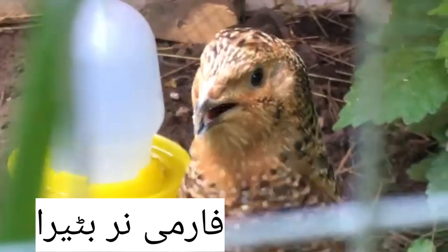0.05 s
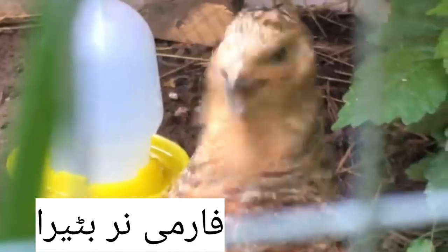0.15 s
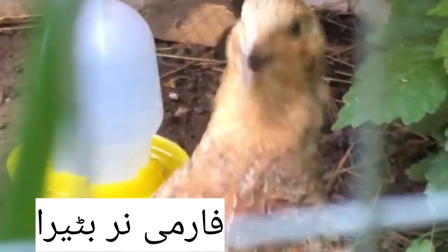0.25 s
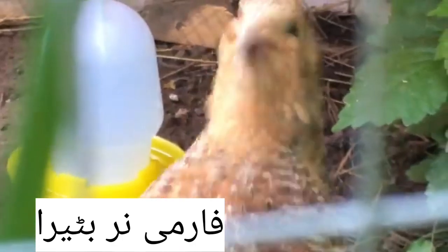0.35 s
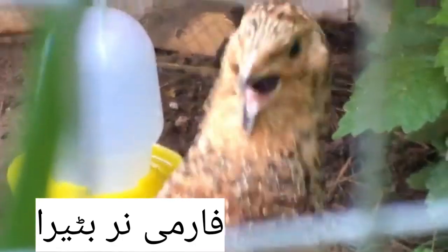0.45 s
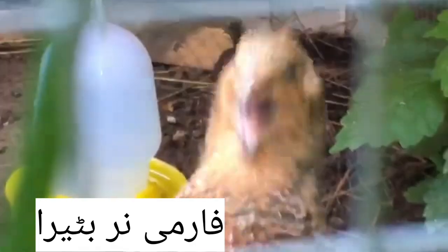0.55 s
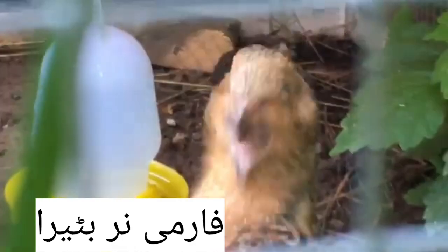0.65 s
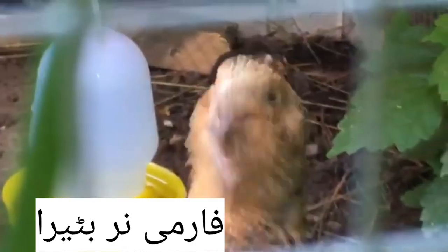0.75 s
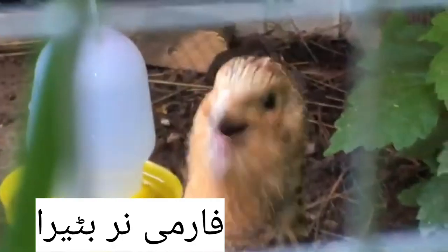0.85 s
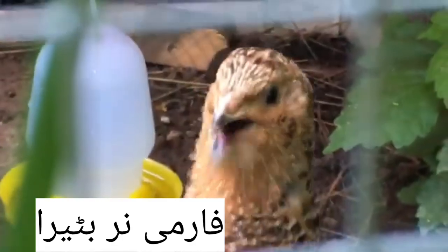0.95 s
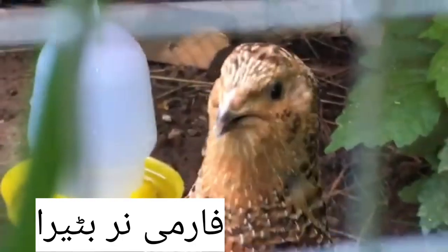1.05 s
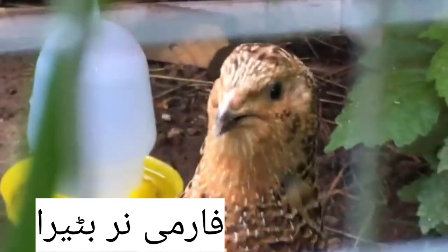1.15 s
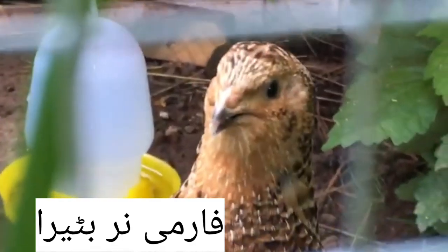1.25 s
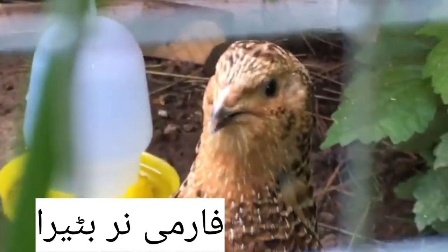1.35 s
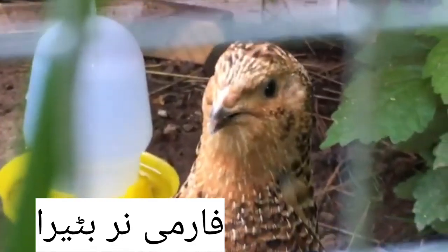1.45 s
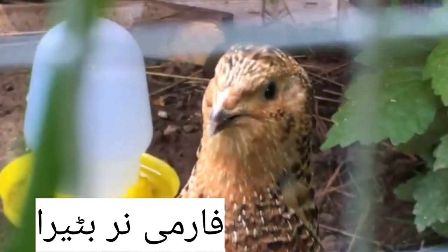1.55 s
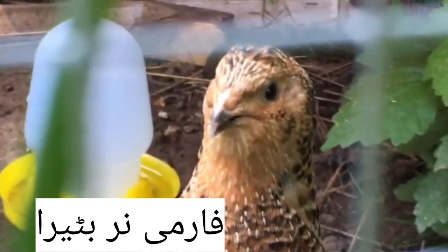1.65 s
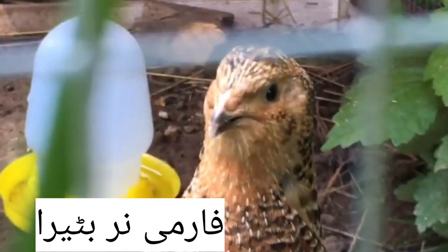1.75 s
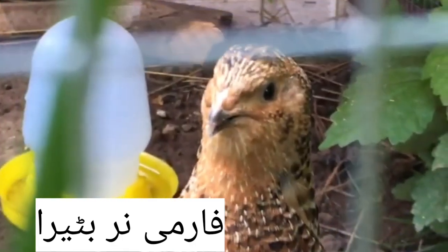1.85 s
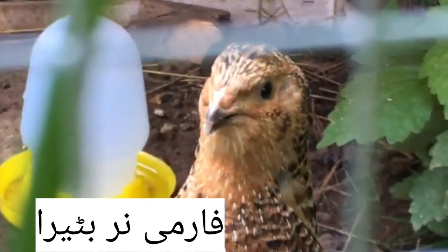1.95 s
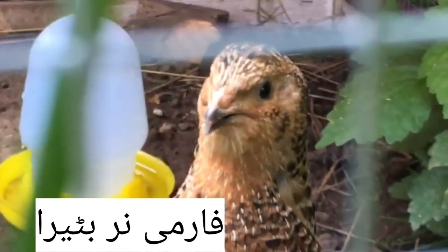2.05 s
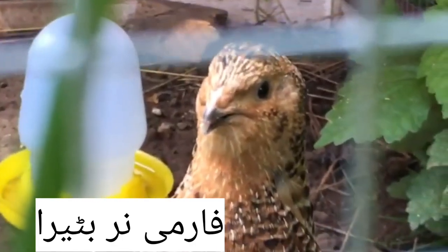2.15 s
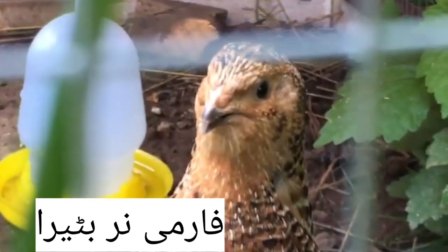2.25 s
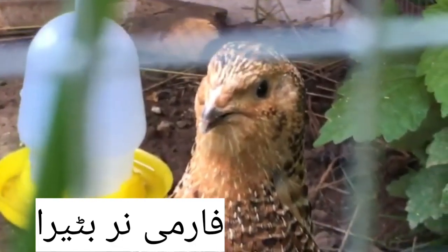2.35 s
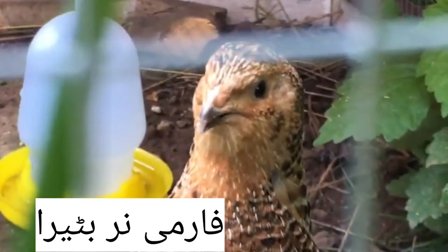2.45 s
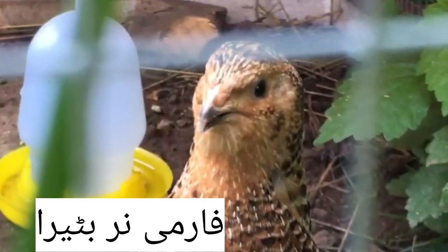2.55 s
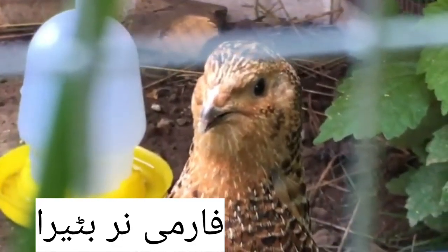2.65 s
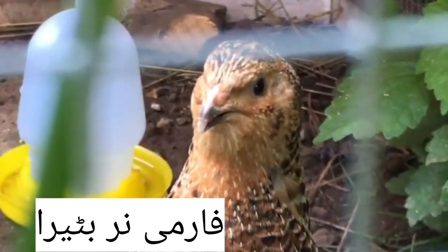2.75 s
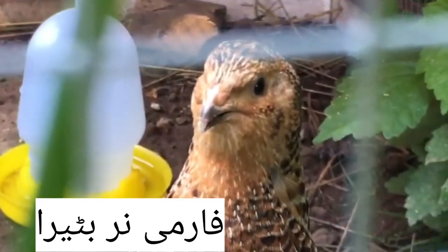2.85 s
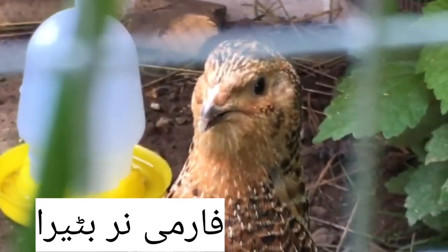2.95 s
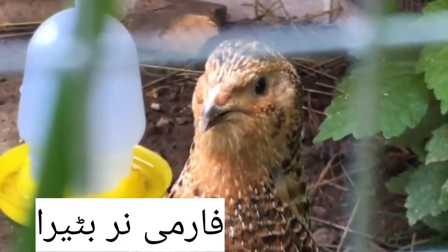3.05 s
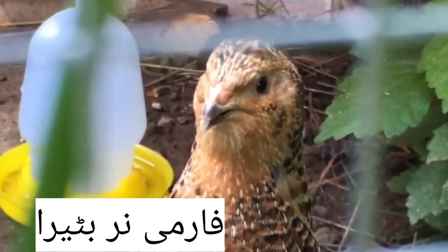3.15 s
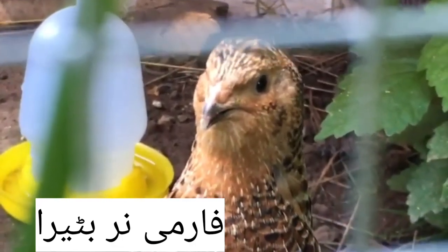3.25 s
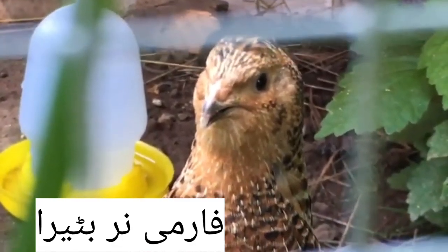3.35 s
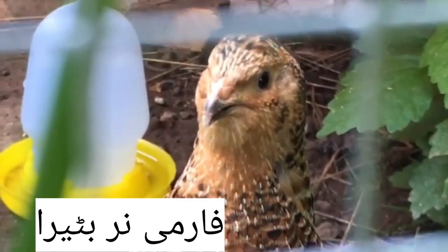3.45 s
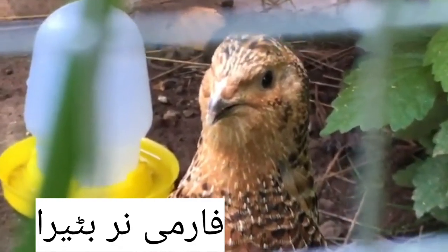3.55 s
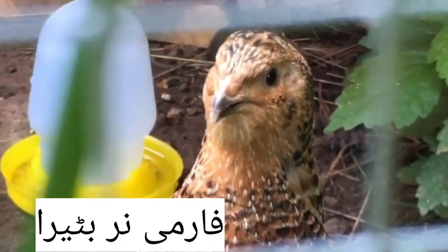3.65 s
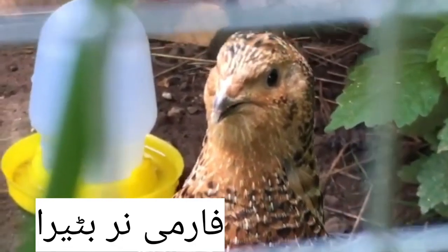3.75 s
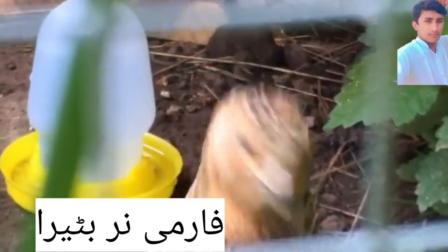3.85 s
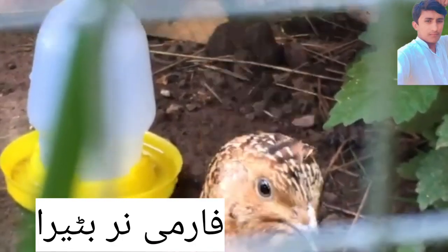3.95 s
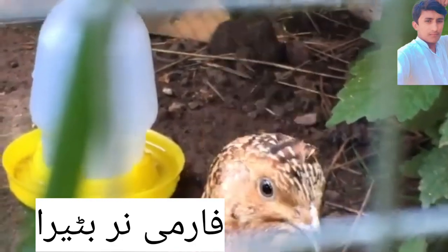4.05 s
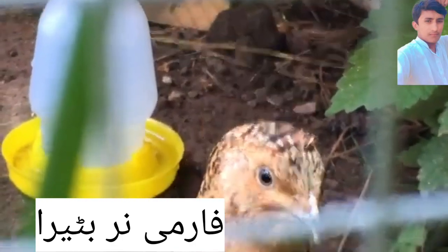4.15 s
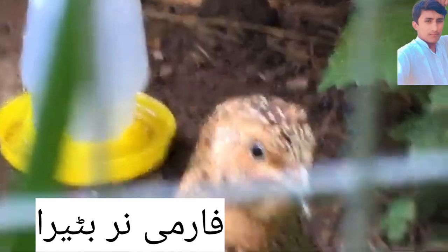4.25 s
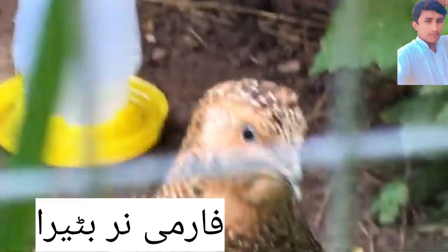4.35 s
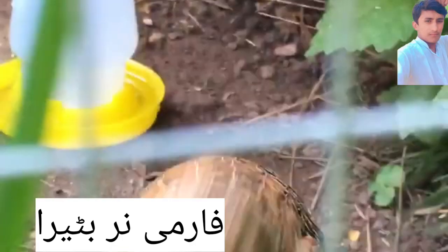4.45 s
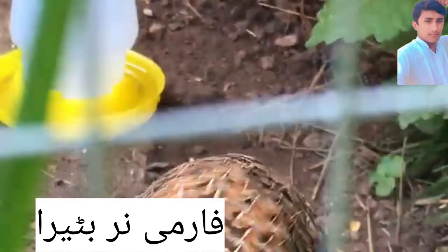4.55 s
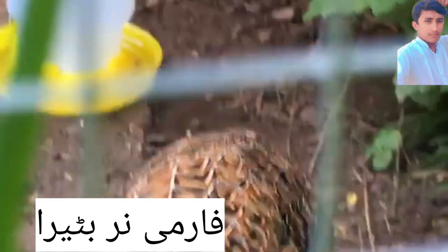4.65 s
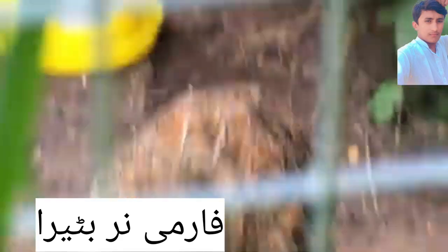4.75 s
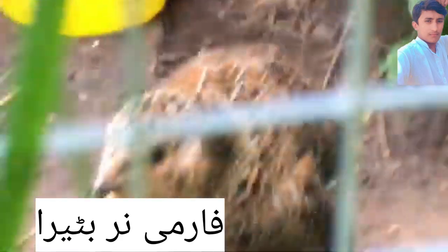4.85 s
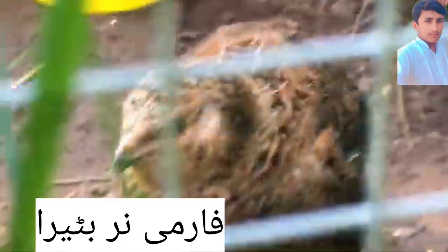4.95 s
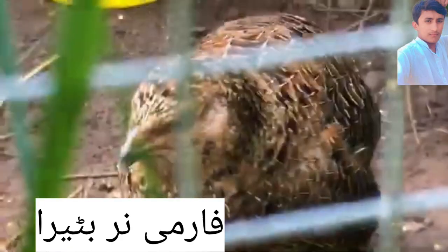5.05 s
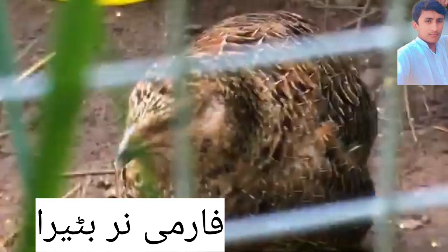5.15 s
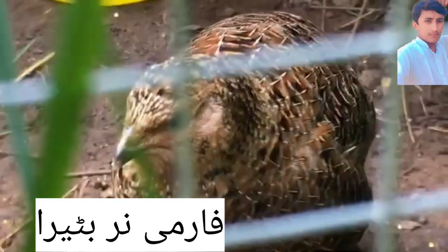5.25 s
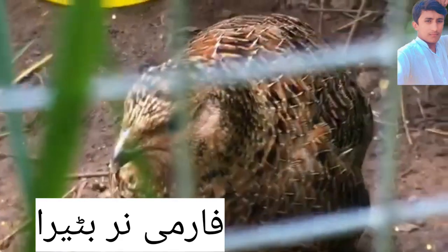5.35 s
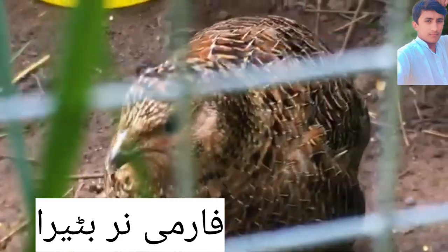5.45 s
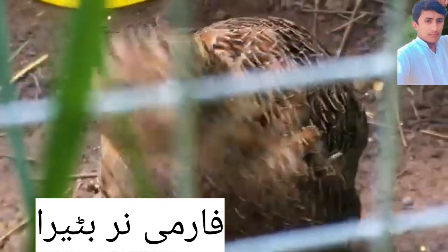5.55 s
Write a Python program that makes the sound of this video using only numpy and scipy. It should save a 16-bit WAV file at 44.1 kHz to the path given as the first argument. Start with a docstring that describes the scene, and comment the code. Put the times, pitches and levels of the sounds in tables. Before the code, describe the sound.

Outdoor yard, close microphone beside a wire cage. One shrill quail crow opens: a quick chirped note, a second short sweep, then a rough trill of rapid up-and-down whistles breaking into rasp and ending hoarse. Afterwards there is near quiet: soft low rumble, faint airy rush and hiss, a few distant falling chirps, the clearest just after three seconds, and small dry rustles.

```python
"""Outdoors in a yard, close to a wire cage: a male quail crows once, two short notes, then a harsh trill.
Its voice is a swept whistle that breaks into noisy rasp at the top of every sweep, shaped by throat and beak.
Ground and cage walls answer with delayed copies, ringing and a short tail; the recorder's gain ducks.
Behind it, filtered noise makes a low rumble, a distant rush, a thin high hiss and light rustles of straw.
Far chirps are short falling tones; a faint far tone and a soft drone come and go."""
import sys
import numpy as np
from scipy import signal
from scipy.fft import rfft, irfft, next_fast_len
from scipy.io import wavfile
from scipy.ndimage import uniform_filter1d, minimum_filter1d, map_coordinates

SR = 44100
rng = np.random.default_rng(int(sys.argv[2]) if len(sys.argv) > 2 else 0)


def wav_out(sig):
    """Save sig, one row per channel (or a flat mono array), as 16-bit PCM at SR to the path in sys.argv[1]."""
    wavfile.write(sys.argv[1], SR, np.round(np.clip(np.atleast_2d(sig).T, -1, 1) * 32767).astype(np.int16))


N = 246519
TOP_HZ = 15830  # upper limit of the recorder and of the whistle's overtones


def amp(db):
    """Decibels to gain."""
    return 10 ** (np.asarray(db) / 20)


def unit(x):
    """Scale to rms 1."""
    return x / np.sqrt(np.mean(x ** 2) + 1e-20)


def along(points, hz):
    """Read (Hz, value) points on a log frequency axis."""
    f, v = np.transpose(points)
    return np.interp(np.log(hz + 1), np.log(f + 1), v)


def clock():
    """The time of every sample, in seconds."""
    return np.arange(N) / SR


def curves(rows):
    """One value per sample for each column after the time."""
    s, *columns = np.transpose(rows)
    return [np.interp(clock(), s, column) for column in columns]


def wobble(rate):
    """A smooth random curve with rate knots a second."""
    knots = rng.standard_normal(int(N * rate / SR) + 4)
    return map_coordinates(knots, [np.arange(N) * rate / SR])


def filtered(x, response):
    """Multiply the spectrum of x by a complex response of frequency."""
    m = next_fast_len(N + SR // 2)
    return irfft(rfft(x, m) * response(np.fft.rfftfreq(m, 1 / SR)), m)[..., :N]


def resonate(x, modes):
    """Pass x through parallel (Hz, width Hz, dB) resonances."""
    def response(f):
        return sum(amp(db) * 1j * f * width / (center ** 2 - f * f + 1j * f * width)
                   for center, width, db in modes)
    return filtered(x, response)


def noise(spectrum):
    """Coloured noise of rms 1."""
    return unit(filtered(rng.standard_normal(N), lambda hz: amp(along(spectrum, hz))))


def turns(hz):
    """The running phase of a moving pitch, in radians."""
    return 2 * np.pi * np.cumsum(hz) / SR


def tone(hz):
    """A sine of rms 1 that follows a moving pitch."""
    return np.sqrt(2) * np.sin(turns(hz))


def swell(start, length):
    """A smooth rise and fall."""
    return np.sin(np.pi * np.clip((clock() - start) / length, 0, 1))


# spectrum of the ground rumble: [f/Hz, relative level/dB per Hz]
RUMBLE_SPECTRUM = [(15, -40.5), (23, -14.5), (31, -17.5), (42, -6), (55, 2.5), (80, -0.5), (110, -0.5),
                   (145, -8), (200, -10), (280, -24), (450, -30), (600, -54.5)]


def low_rumble(start_db=-40.5, rise_db_per_s=0.4151, sway_db=.6):
    """Low noise that slowly grows and sways a little."""
    level_db = start_db + rise_db_per_s * clock() + sway_db * wobble(11)
    return amp(level_db) * noise(RUMBLE_SPECTRUM)


# spectrum of the distant rush: [f/Hz, relative level/dB per Hz]
RUSH_SPECTRUM = [(150, -25), (300, 0.5), (420, -4.5), (600, -5), (900, -7), (1500, -11.5), (2300, -17),
                 (4500, -23), (6000, -43)]


def distant_rush(level_db):
    """Broad low noise at a slowly moving level, with slight unsteadiness."""
    return amp(level_db + 0.55 * wobble(8.3)) * noise(RUSH_SPECTRUM)


# the faint far tone: [start t/s, length/s, peak level/dB]
FAR_TONE = [(3.298, 1.47, -64.5), (5.05, 0.66, -65)]


def far_tone(hz=775):
    """A faint, slightly unsteady sine that comes and goes."""
    level = sum(amp(db) * swell(s, length) for s, length, db in FAR_TONE)
    return level * tone(hz * (1 + .004 * wobble(21)))


def soft_drone(peak_db=-63):
    """A narrow low band of noise that swells once and fades."""
    band = noise([(200, -60), (310, -10), (400, 3), (480, -27), (800, -80)])
    return amp(peak_db) * swell(1.603, 1.5) * band


# spectrum of the thin hiss before its pitch drifts: [f/Hz, relative level/dB]
HISS_SPECTRUM = [(2240, -42), (3800, -15.5), (4210, -18.5), (4570, -10.5), (4880, -12), (6010, -4),
                 (6540, 0), (7280, -7), (8400, -8), (10300, -19), (11800, -20), (15200, -20),
                 (15800, -19.5)]
# drift of the hiss's peak; only the ratio to the highest value counts: [t/s, f/Hz]
HISS_DRIFT = [(0, 6450), (2.3, 6477), (3.9, 6346), (4.8, 5945), (5.6, 6078)]


def thin_hiss():
    """High noise read at a varying speed, which moves its spectral peak."""
    hz, = curves(HISS_DRIFT)
    place = np.cumsum(hz / hz.max())
    return unit(map_coordinates(noise(HISS_SPECTRUM), [place], order=5, mode="wrap"))


# open-air levels: [t/s, distant rush level/dB, thin hiss level/dB]
AIR_LEVELS = [(0, -55, -58), (2.3, -59, -58), (3.2, -58.5, -58.5), (3.7, -56.5, -59.5), (4.3, -57, -60),
              (4.8, -58.5, -62.5), (5.4, -57, -63)]


def outdoors():
    """The steady bed of the place: rumble, rush, far tone, drone and hiss summed."""
    rush_db, hiss_db = curves(AIR_LEVELS)
    low = low_rumble() + distant_rush(rush_db)
    return low + far_tone() + soft_drone() + amp(hiss_db) * thin_hiss()


# decay of the yard: [f/Hz, time to fall 60 dB/s]
YARD_DECAY = [(400, .1), (1800, 0.19), (4000, 0.067), (12000, 0.075)]


def yard(x):
    """A short diffuse tail of decaying noise; each frequency dies at its own speed."""
    hz, t, z = signal.stft(rng.standard_normal(SR // 2), SR, nperseg=256)
    decay = amp(-60 * t / along(YARD_DECAY, hz)[:, None])
    tail = signal.istft(z * decay, SR, nperseg=256)[1]
    return signal.fftconvolve(x, tail / np.linalg.norm(tail))[:N]


# far birds: [start t/s, length/s, start f/Hz, end f/Hz, relative peak level/dB]
FAR_CHIRPS = [(2.16, 0.057, 5200, 5000, -69), (2.41, .1, 3900, 3420, -68), (3.268, 0.019, 3200, 3065, -59),
              (3.279, 0.026, 4120, 3660, -50.5), (3.297, 0.036, 3230, 3094, -54.5),
              (4.011, 0.0532, 4100, 3700, -68), (4.06, .07, 3900, 3500, -68)]


def far_birds(waver=0.082, direct=0.51, wet=0.99):
    """Small falling, wavering tones, blurred by distance through the yard's tail."""
    song = np.zeros(N)
    for s, length, start_hz, end_hz, db in FAR_CHIRPS:
        hz = np.interp(clock(), [s, s + length], [start_hz, end_hz])
        song += amp(db) * swell(s, length) * tone(hz * (1 + waver * wobble(1100)))
    return direct * song + wet * yard(song)


# straw underfoot: [start t/s, length/s, peak level/dB]
STRAW_STROKES = [(1.996, 0.033, -63), (2.867, .15, -62), (3.555, .15, -64), (3.737, 0.15, -70),
                 (4.878, 0.011, -57.5), (5.116, .14, -59)]
# spectrum of the straw: [f/Hz, relative level/dB per Hz]
STRAW_SPECTRUM = [(5000, -12), (9000, -4), (12500, -2.5), (15800, -1)]


def straw(grain_db=3):
    """Brief rustles of bright noise, made grainy by a fast random level."""
    strokes = sum(amp(db) * swell(s, length) for s, length, db in STRAW_STROKES)
    grains = noise(STRAW_SPECTRUM) * amp(grain_db * wobble(250))
    return strokes * unit(grains)


def opening_note(pitch_curve=.85, gain_curve=1.2, fizz_curve=2, fizz_db=3.0):
    """Pitch, gain, roughness and fizz of one push of effort, which lifts pitch and loudness together."""
    start_s, rise_s, fall_s = .1565, .0205, .041
    low_hz, peak_hz, peak_db, roughness = 1170.6, 1989, 2.5, 0.11
    peak_s = start_s + rise_s
    effort = np.interp(clock(), [start_s, peak_s, peak_s + fall_s], [0, 1, 0])
    hz = low_hz + (peak_hz - low_hz) * effort ** pitch_curve
    gain = amp(peak_db) * effort ** gain_curve
    fizz = amp(fizz_db) * effort ** fizz_curve
    return np.array([hz, gain, np.full(N, roughness), fizz]) * (effort > 0)


# one sweep from flick to flick: [share of the cycle, height 0-1 from dip to crest,
# relative level/dB, roughness 0-1, relative fizz level/dB]
SWEEP_SHAPE = [(0, .54, 0, 0.24, -2), (.06, .97, -2.5, .5, -4.5), (.21, 1, -10.5, .72, -8.5),
               (.44, .5, -1.5, .52, 5), (.6, 0, -3.5, 0.2, -4.5), (.8, .05, -4.5, .15, 0.5),
               (.93, .17, 0.5, .05, -1)]


def sweeps(phrase, flick_s, sweep_s=.0459, crest_hz=4570, fizz_growth=1.7):
    """Pitch, gain, roughness and fizz of steady sweeps: a clean dip, a flick to a rough crest, a fall."""
    attack_s, release_s = .007, .028
    dip_hz, db, hoarse = curves(phrase)
    share, *shape = np.transpose(SWEEP_SHAPE)
    t = clock()
    # wait in the dip until the first flick is due
    dip_share = share[np.argmin(shape[0])]
    cycle = np.maximum((t - flick_s) / sweep_s, dip_share - 1)
    height, sweep_db, rough, fizz_db = (np.interp(cycle, share, column, period=1) for column in shape)
    fade_in = np.clip((t - phrase[0][0]) / attack_s, 0, 1)
    fade_out = np.clip((phrase[-1][0] - t) / release_s, 0, 1)
    gate = fade_in * fade_out
    hz = dip_hz * (crest_hz / dip_hz) ** height
    # the fizz far above the whistle grows faster than it with effort
    fizz = gate * amp(fizz_growth * db + fizz_db)
    return np.array([hz, gate * amp(db + sweep_db), rough + hoarse, fizz]) * (gate > 0)


# overtones of the whistle: [f/Hz, level/dB re the whistle]
OVERTONE_LEVELS = [(2150, -2), (2600, -22.5), (3800, -23.5), (5200, -40.5), (6200, -32), (7500, -17.5),
                   (9000, -37.5), (11000, -26.5), (13500, -25), (16000, -29.5)]


def syrinx(hz, rough, jitter=.1, flutter=1.0):
    """A whistle with weak overtones; roughness shakes its pitch and strength."""
    phase = turns(hz * (1 + jitter * np.sqrt(rough) * wobble(1300)))
    wave = np.sin(phase)
    for k in range(2, 10):
        level = amp(along(OVERTONE_LEVELS, k * hz)) * (k * hz < TOP_HZ)
        wave = wave + level * np.sin(k * phase)
    strength = 1 + flutter * np.sqrt(rough) * np.tanh(wobble(800))
    return np.sqrt(2) * wave * strength


# shrill resonances of the beak: [f/Hz, width/Hz, relative level/dB]
BEAK_RESONANCES = [(5920, 560, -2.5), (7550, 660, -0.5), (8640, 1700, -8), (11230, 3800, 1),
                   (12530, 600, 0.5), (14003, 800, -0.5), (14880, 900, -0.5)]


def beak_fizz(depth_db=10.0):
    """Each shrill resonance flares up and fades on its own, a few milliseconds at a time."""
    fizz = np.zeros(N)
    for hz, width, db in BEAK_RESONANCES:
        phase = 2 * np.pi * hz * clock()
        band = wobble(width) * np.cos(phase) + wobble(width) * np.sin(phase)
        flare = amp(depth_db * np.clip(wobble(200), -2, 2))
        fizz += amp(db) * unit(band * flare)
    return unit(fizz)


# the second note, a single sweep: [t/s, dip f/Hz, relative level/dB, added hoarseness 0-1]
SECOND_NOTE = [(.287, 1043, -13, 0.3), (.299, 1459, -2.5, 0.07), (.31, 1444, -9, 0.08),
               (.315, 1552, 0.5, .05), (.34, 1494, -14, 0.01)]
# the trill swells, sags and ends hoarse: [t/s, dip f/Hz, relative level/dB, added hoarseness 0-1]
TRILL_PHRASE = [(.447, 1031, -6.5, 0), (.455, 1091, -8.5, 0), (.461, 1381, -6.5, 0), (.51, 1570, -0.5, .1),
                (.555, 1902, 1, 0.1), (.65, 1781, 0, 0.04), (.79, 1658, -3, 0.08), (.842, 1645, -6, .3),
                (.868, 2906, -6.5, 0.48), (.892, 2900, -8, 0.52), (.936, 2894, -27, .6)]
# spectrum of the turbulent rasp: [f/Hz, relative level/dB per Hz]
RASP_SPECTRUM = [(300, -38.5), (620, -20), (800, -19.5), (1050, -4.5), (1300, -3.5), (2100, -5), (3700, 0),
                 (4700, -11), (5300, -17.5), (6000, -10.5), (6900, -16), (9000, -23.5), (15800, -24)]
# resonances of the throat: [f/Hz, width/Hz, level/dB]
THROAT_RESONANCES = [(618, 380, 1), (1312.5, 120, 2), (1680, 39, -6.5), (2060, 119.7, -0.5),
                     (2760, 200, -8), (3480, 170, -9.5), (4565, 127, -6)]


def quail(rasp_db=-1.0, fizz_db=-13.0, open_share=0.35, lowest_hz=480):
    """Three phrases; with roughness the whistle yields to turbulence, and all pass through the throat."""
    # the phrases do not overlap, so their controls add; flick_s is the first upward flick
    second, trill = sweeps(SECOND_NOTE, flick_s=.3146), sweeps(TRILL_PHRASE, flick_s=.4765)
    hz, gain, rough, shrill = opening_note() + second + trill
    rough = np.clip(rough, .01, .98)
    whistle = np.sqrt(1 - rough) * syrinx(hz, rough)
    turbulence = amp(rasp_db) * rough ** 0.96 * noise(RASP_SPECTRUM)
    fizz = amp(fizz_db) * shrill * rough ** 0.21 * beak_fizz()
    voice = gain * (whistle + turbulence) + fizz
    # the voice falls away steeply below about 500 Hz
    voice = filtered(voice, lambda f: (1j * f / (lowest_hz + 1j * f)) ** 3)
    return open_share * voice + resonate(voice, THROAT_RESONANCES)


# near reflections off ground and cage walls: [delay/s, strength re direct sound]
NEAR_REFLECTIONS = [(.00222, .12), (.00345, .2), (.00664, .12), (0.0119, 0.054)]
# ringing of the wire cage: [f/Hz, width/Hz, relative level/dB]
CAGE_MODES = [(1786.5, 6, 1.5), (3063, 8, 6)]


def cage(x, ring_db=-24):
    """Close reflections comb the call, and the cage rings faintly after it."""
    def comb(hz):
        return 1 + sum(g * np.exp(-2j * np.pi * hz * delay) for delay, g in NEAR_REFLECTIONS)
    return filtered(x, comb) + amp(ring_db) * resonate(x, CAGE_MODES)


def spread(x, width):
    """Scattered treble reaches the two microphone ports differently; the rest stays central."""
    t = np.arange(SR // 20) / SR
    scatter = rng.standard_normal(len(t)) * amp(-60 * t / .07)
    scattered = signal.fftconvolve(x, scatter / np.linalg.norm(scatter))[:N]
    side = filtered(scattered, lambda hz: amp(along(width, hz)))
    return x + np.outer([1, -1], side)


# stereo width of the crow at the microphone: [f/Hz, side level/dB re centre]
CROW_WIDTH = [(3900, -71.5), (4400, -20), (5400, -6), (6100, -13), (7700, -10), (9500, -1), (12000, -12),
              (15800, -6.5)]
# stereo width of everything behind it: [f/Hz, side level/dB re centre]
BACKGROUND_WIDTH = [(3900, -67), (4500, -13), (6500, -28), (9000, -14.5), (11000, -5.5), (15800, -4.5)]


def scene(call_db=1, yard_db=-26):
    """The quail close in front, the yard around it."""
    background = outdoors() + far_birds() + straw()
    crow = amp(call_db) * quail()
    near = cage(crow) + amp(yard_db) * yard(crow)
    return spread(background, BACKGROUND_WIDTH) + spread(near, CROW_WIDTH)


def record(dry, ceiling=0.81, hold_s=0.46, release_db_per_s=45):
    """Gain control ducks on the crow, holds and recovers; peaks are rounded off and the top is cut."""
    t = clock()
    # the left channel steers both
    strength = np.sqrt(2 * np.abs(uniform_filter1d(dry[0] ** 2, size=256)))
    needed_db = np.minimum(0, 20 * np.log10(ceiling / (strength + 1e-9)))
    half = int(hold_s * SR / 2)
    held_db = minimum_filter1d(needed_db, 2 * half + 1, origin=half, mode="nearest")
    # the gain may fall at once but rises only at the release rate
    release_db = release_db_per_s * t
    gain_db = np.minimum.accumulate(held_db - release_db) + release_db
    ducked = dry * amp(uniform_filter1d(gain_db, size=128))
    rounded = ducked / (1 + np.abs(ducked / .97) ** 6) ** (1 / 6)
    return filtered(rounded, lambda hz: np.clip((TOP_HZ - hz) / 150 + .5, 0, 1))


dry = scene()
out = record(dry)
wav_out(out)
```